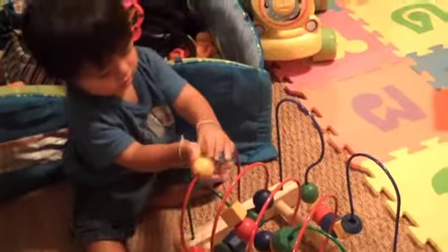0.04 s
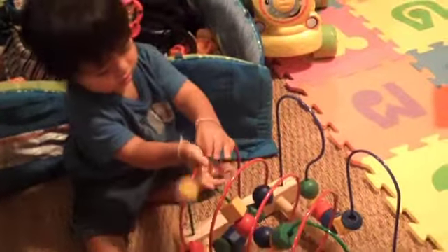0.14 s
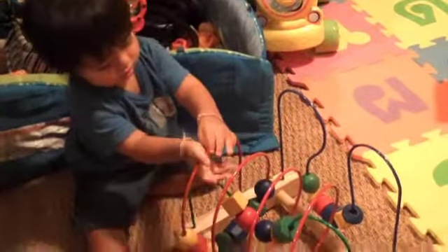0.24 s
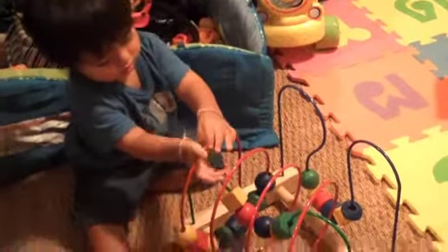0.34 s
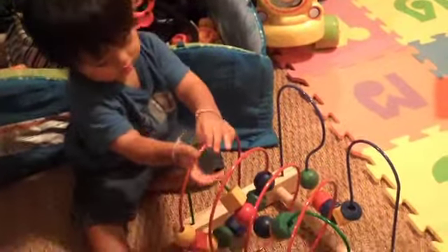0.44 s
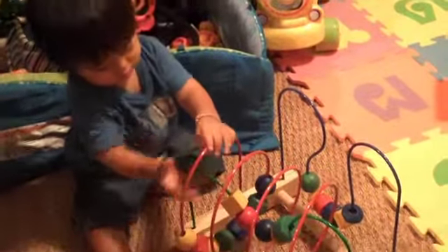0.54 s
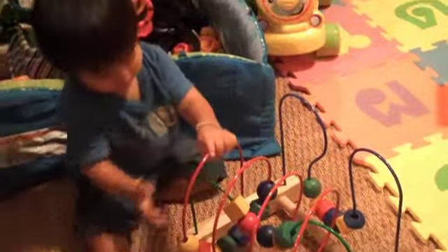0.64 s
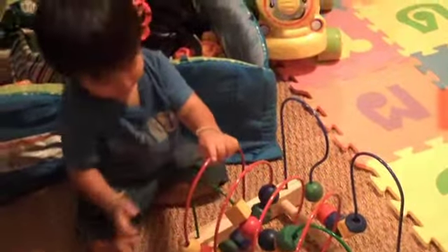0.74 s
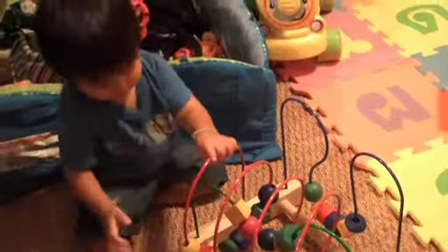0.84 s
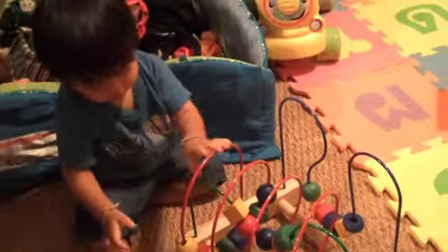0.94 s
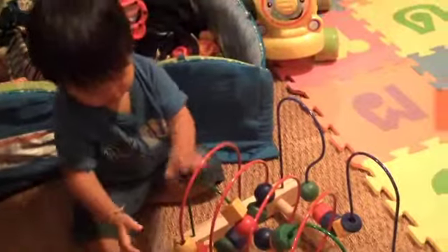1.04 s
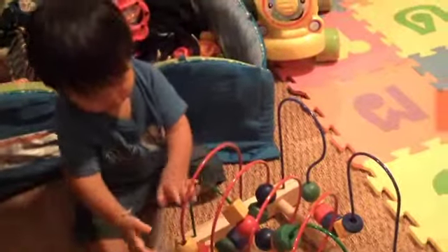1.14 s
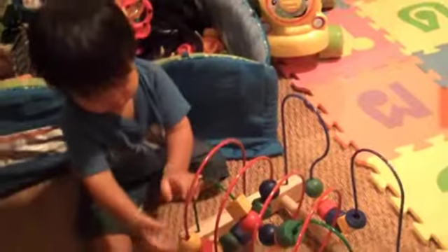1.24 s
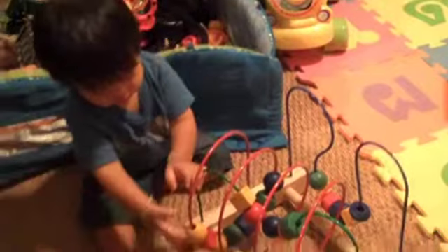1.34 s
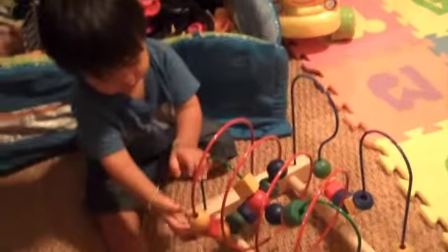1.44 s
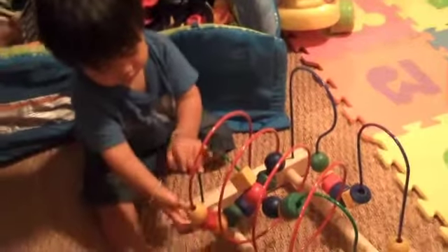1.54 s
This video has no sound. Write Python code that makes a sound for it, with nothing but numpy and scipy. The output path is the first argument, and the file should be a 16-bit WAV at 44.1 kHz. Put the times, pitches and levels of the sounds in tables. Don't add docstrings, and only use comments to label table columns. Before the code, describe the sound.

Wooden beads on a wire toy in a small room. Barely audible touches at 0.05 and 0.13 s, a faint dense rattle from 0.16 s, a knock at 0.22 s, then a loud, dry wooden crack at 0.26 s with brief wire ring and echo. Faint steady hum and hiss remain. Soft double knock at 1.34-1.37 s, another at 1.44 s, a barely audible touch at 1.59 s.

```python
import sys
import numpy as np
from scipy import signal
from scipy.fft import rfft, irfft
from scipy.io import wavfile

SR = 44100
rng = np.random.default_rng(int(sys.argv[2]) if len(sys.argv) > 2 else 0)


def transcribe(signal):
    frames = np.atleast_2d(signal).T
    limited = np.clip(frames, -1, 1)
    pcm = np.round(limited * 32767).astype(np.int16)
    wavfile.write(sys.argv[1], SR, pcm)


def makeup_ratio(level_db):
    decades = np.asarray(level_db, float) / 20
    return 10 ** decades


N = 70560


def unit(x):
    return x / np.sqrt(np.mean(x ** 2))


def walk(hz):
    low_pass = signal.butter(2, hz, fs=SR, output="sos")
    return unit(signal.sosfilt(low_pass, rng.standard_normal(N + SR))[SR:])


def place(x, start_s):
    out, i = np.zeros(N), int(start_s * SR)
    out[i:i + len(x)] = x[:N - i]
    return out


def ring(force, modes, scatter_db=0.0):
    out, chance = 0, rng.standard_normal(len(modes))
    for k, (hz, db, t60_s) in enumerate(modes):
        radius = np.exp(-np.log(1000) / (t60_s * SR))
        angle = 2 * np.pi * hz / SR
        gain = (-1) ** k * makeup_ratio(db + scatter_db * chance[k])
        numerator = [0, radius * np.sin(angle)]
        denominator = [1, -2 * radius * np.cos(angle), radius * radius]
        out = out + gain * signal.lfilter(numerator, denominator, force)
    return out


def chatter(t, decay_ms):
    rise_ms = 1.5
    swell = 1 - np.exp(-t / (rise_ms / 1000))
    x = rng.standard_normal(len(t)) * swell * np.exp(-t / (decay_ms / 1000))
    return x / np.sqrt(np.sum(x ** 2))


def landing():
    # (frequency [Hz], level [dB], t60 [s])
    bead_modes = [(4800, 7.5, 0.0044), (5510, -2, 0.0081), (6090, -2.5, 0.0051), (2213, -22.5, 0.0047),
                  (1220, -17.5, 0.0077)]
    # (frequency [Hz], level [dB], t60 [s])
    base_modes = [(1142, -4, 0.0067), (1278, -6, 0.028), (1620, -4, 0.008), (1870, 0, 0.0083),
                  (2194, -4.5, .02), (2550, -5, .015), (2884, -1.5, .02), (3283, -5, .012),
                  (3870, -4.5, .012), (4176, -3.5, .01), (5570, -7.5, .005), (6480, -10, .005),
                  (7200, -14.5, 0.004)]
    # (frequency [Hz], level [dB], t60 [s])
    wire_rings = [(1258, -5, 0.17), (1870, -11, 0.11), (2258, -7, 0.081), (2352, -20.5, 0.42),
                  (2836, -12, 0.12), (2880, -14.5, 0.3), (3086, -2.5, .12), (3135, -8, 0.033)]
    land_s, chatter_ms = 0.26255, 15.7
    crack_db, base_db, wires_db = -17, -20.5, -34.5
    rebound_ms, rebound_db, wire_rise_s = 0.6, -8, 0.0032
    crack_echo_db, wires_echo_db = -3.5, -13.5

    t = np.arange(SR // 2) / SR
    blow = 1.0 * (t == 0)
    rebound = makeup_ratio(rebound_db) * np.roll(blow, int(rebound_ms * SR / 1000))
    contact = np.convolve(blow + rebound, [0.25, 0.5, 0.25])[:len(t)]
    crack = makeup_ratio(crack_db) * ring(contact, bead_modes)
    base = makeup_ratio(base_db) * ring(chatter(t, chatter_ms), base_modes)
    wires = makeup_ratio(wires_db) * ring(blow, wire_rings) * np.minimum(t / wire_rise_s, 1)
    direct = crack + base + wires
    to_walls = makeup_ratio(crack_echo_db) * crack + base + makeup_ratio(wires_echo_db) * wires
    return place(direct, land_s), place(to_walls, land_s)


def knocks(events, modes):
    # (frequency [Hz], level [dB], t60 [s])
    edge_modes = [(4100, 2, 0.002), (5000, 1, 0.0013), (6500, -8, 0.0027), (7200, -14.5, .004)]
    out, t = 0, np.arange(SR // 4) / SR
    for start_s, level_db, chatter_ms, crack_db in events:
        body = makeup_ratio(level_db) * ring(chatter(t, chatter_ms), modes, scatter_db=2)
        edge = makeup_ratio(crack_db + 12) * ring(chatter(t, 0.2 * chatter_ms), edge_modes)
        out = out + place(body + edge, start_s)
    return out


def falling_bead():
    # (time [s], level [dB], contact chatter [ms], crack level [dB])
    events = [
        (.0488, -64, 10.8, -68),
        (.1965, -56, 1.9, -75.5),
        (.2190, -33.5, 10, -48.5),
    ]
    # (frequency [Hz], level [dB], t60 [s])
    modes = [(1166, -2.5, .03), (1920, -5.5, .02), (2328, -3, .025), (2895, 4, 0.021), (3692, -9.5, 0.032),
             (4485, -6.5, 0.0084), (6000, -20.5, .005), (7200, -20.5, .005)]
    return knocks(events, modes)


def pushed_beads():
    # (time [s], level [dB], contact chatter [ms], crack level [dB])
    events = [
        (.128, -65, 8, -82),
        (1.3445, -38, 22.7, -57.5),
        (1.3665, -43, 4.8, -58),
        (1.386, -66.5, 5.3, -86),
    ]
    # (frequency [Hz], level [dB], t60 [s])
    modes = [(650, -23, 0.086), (1080, -6, 0.028), (1260, -5.5, 0.032), (1504, -4.5, 0.0088),
             (1805, -1, .018), (2240, -3, 0.042), (2360, 0, 0.0082), (2914, 0, 0.015), (3430, -3.5, .015),
             (4160, -8, 0.012), (4700, -12.5, 0.0056), (6300, -23, 0.0046)]
    return knocks(events, modes)


def bead_on_bead():
    # (time [s], level [dB], contact chatter [ms], crack level [dB])
    events = [
        (1.4420, -42, 8.1, -57.5),
        (1.590, -63.5, 9.4, -80),
    ]
    # (frequency [Hz], level [dB], t60 [s])
    modes = [(1077, -8, 0.054), (1290, -3.5, .015), (1775, 2.5, 0.04), (2246, -0.5, .025),
             (2424, -2, 0.025), (2944, -1, 0.057), (3264, -4, 0.024), (3880, -4.5, 0.011),
             (4960, -18, .006), (6100, -12.5, 0.0064)]
    return knocks(events, modes)


def slide():
    # (time [s], level [dB])
    envelope = [(0.089, -75), (.14, -80.5), (.165, -56), (0.188, -55.5), (.212, -58.5), (0.249, -65),
                (0.26, -83.5)]
    # (frequency [Hz], level [dB], t60 [s])
    wire_modes = [(1026, -7.5, 0.059), (1286, -3, 0.052), (1630, -4, .012), (1883, -3, 0.054),
                  (2150, -2, 0.029), (2500, -7, .012), (2940, -1, 0.017)]
    ticks_per_s, scatter_db = 1300, 1.5
    chance = rng.random((3, N))
    struck = chance[0] < ticks_per_s / SR
    strength = makeup_ratio(-scatter_db * np.log(chance[1] + 1e-9))
    ticks = struck * strength * np.sign(chance[2] - 0.5)
    time_s, level_db = np.array(envelope).T
    level = makeup_ratio(np.interp(np.arange(N) / SR, time_s, level_db, -120, -120))
    return unit(ring(ticks, wire_modes)) * level


def room(x):
    # (centre [Hz], level [dB], t60 [s])
    bands = [(519, -26.5, 0.37), (1100, -4.5, .3), (1852, -2, 0.27), (3447, -13, 0.47), (4400, -12.5, 0.17),
             (5800, -10, 0.089), (7235, -8.5, 0.32)]
    gap_s, rise_s = 0.0024, 0.004
    t, echo = np.arange(SR // 2) / SR, 0
    for hz, db, t60_s in bands:
        band_pass = signal.butter(2, [hz / 1.135, hz * 1.305], "band", fs=SR, output="sos")
        noise = signal.sosfilt(band_pass, rng.standard_normal(len(t)))
        echo = echo + makeup_ratio(db - 29 - 60 * t / t60_s) * noise
    onset = np.clip((t - gap_s) / rise_s, 0, 1)
    return signal.fftconvolve(x, echo * onset)[:N]


def unsteady_tone(hz, drift_hz, drift_rate_hz, level_db, wobble_db, wobble_rate_hz):
    phase = 2 * np.pi * np.cumsum(hz + drift_hz * walk(drift_rate_hz)) / SR
    return np.sin(phase) * makeup_ratio(level_db + wobble_db * walk(wobble_rate_hz))


def hum():
    # (frequency [Hz], level [dB], t60 [s])
    drone_modes = [(205, 2, 0.15), (170, -7, .08)]
    low = unsteady_tone(236, 1, 1.6, -65 + 3, 0.3, 4.1)
    overtone = unsteady_tone(556, 4, 1.7, -78.5, 1.77, 3.3)
    drone = unit(ring(rng.standard_normal(N), drone_modes)) * makeup_ratio(-78.5)
    return low + overtone + drone


def hiss_and_rumble():
    # (frequency [Hz], density [dB per Hz])
    spectrum = [(150, -37), (260, -0.5), (272, -7.5), (566, -6), (665, -8), (1140, -10.5), (1560, -12),
                (5570, -24), (8650, -27.5), (11200, -71.5), (19000, -120)]
    hz, db = np.array(spectrum).T
    f = np.arange(N // 2 + 1) * SR / N
    shape = makeup_ratio(np.interp(np.log(f + 1), np.log(hz), db)) * np.minimum(f / 150, 1)
    hiss = irfft(rfft(rng.standard_normal(N)) * shape, N)
    band_pass = signal.butter(1, [15, 200], "band", fs=SR, output="sos")
    rumble = signal.sosfilt(band_pass, rng.standard_normal(N))
    return unit(hiss) * makeup_ratio(-69.5 + 1.1 * walk(1)) + unit(rumble) * makeup_ratio(-74)


def scene():
    direct, to_walls = landing()
    soft = falling_bead() + pushed_beads() + bead_on_bead() + slide()
    echo = room(soft + to_walls)
    return (soft + direct + echo + hum() + hiss_and_rumble())[None]


def offset_swings():
    # (time [s], offset jump [full scale])
    steps = [
        (.2630, -.0074),
        (.609, .0028),
        (.6435, .003),
    ]
    edge_s, fade_s, rest_offset = 0.0004, 0.092, -0.0004
    t, swing = np.arange(N) / SR, rest_offset
    for step_s, jump in steps:
        since_s = np.maximum(t - step_s, 0)
        swing = swing + jump * (1 - np.exp(-since_s / edge_s)) * np.exp(-since_s / fade_s)
    return swing


def top_cut(x):
    return signal.sosfilt(signal.butter(12, 8800, fs=SR, output="sos"), x)


def record(dry):
    top_hz = 7620
    dull = signal.sosfilt(signal.butter(12, top_hz, fs=SR, output="sos"), dry)
    return top_cut(dull + offset_swings())


dry = scene()
out = record(dry)
transcribe(out)
```